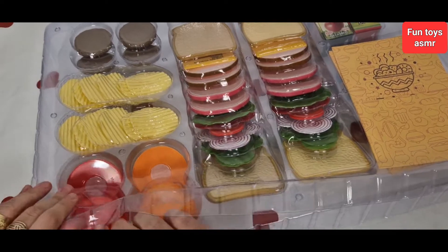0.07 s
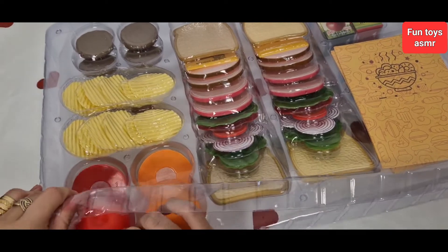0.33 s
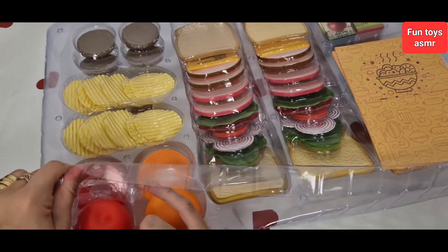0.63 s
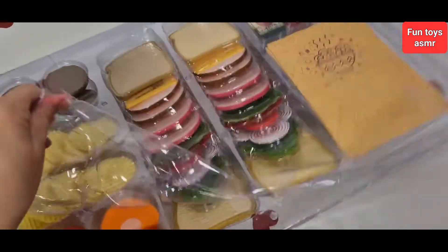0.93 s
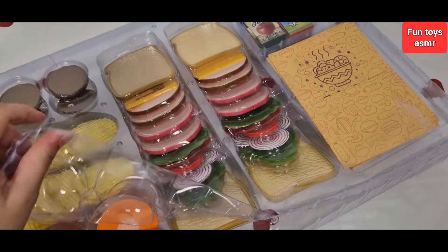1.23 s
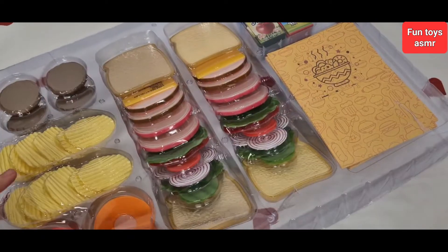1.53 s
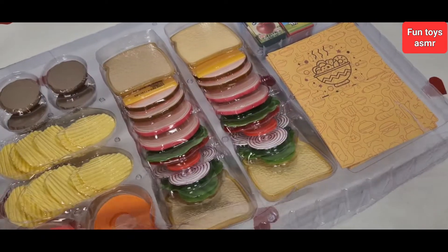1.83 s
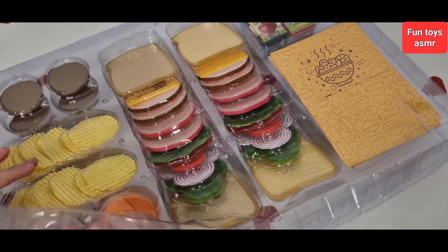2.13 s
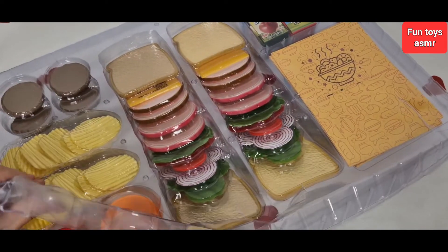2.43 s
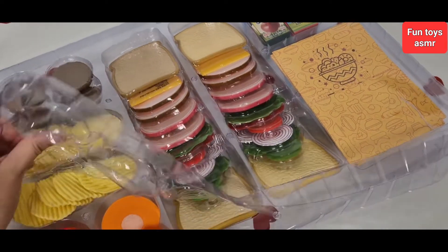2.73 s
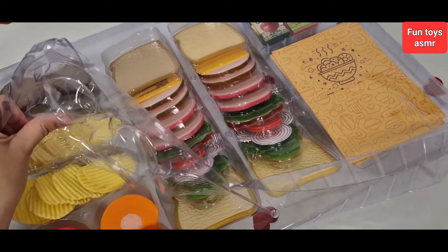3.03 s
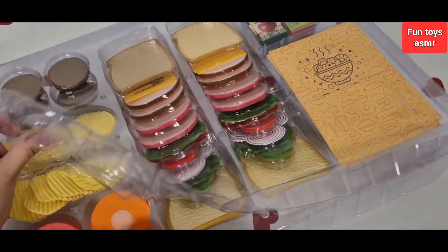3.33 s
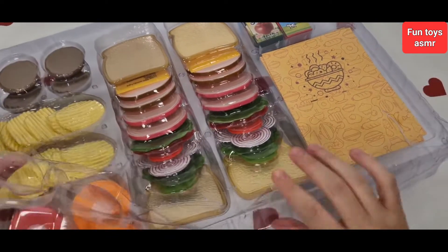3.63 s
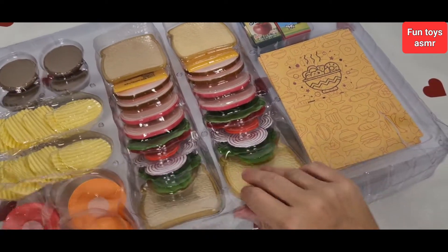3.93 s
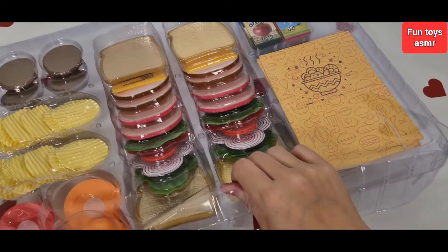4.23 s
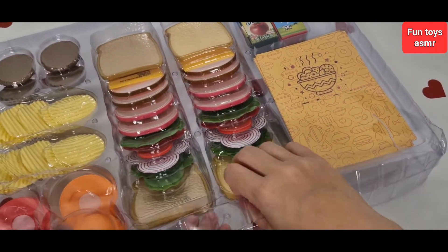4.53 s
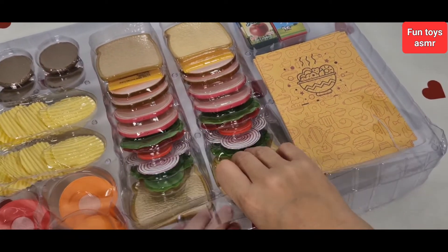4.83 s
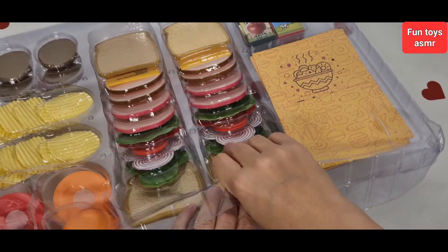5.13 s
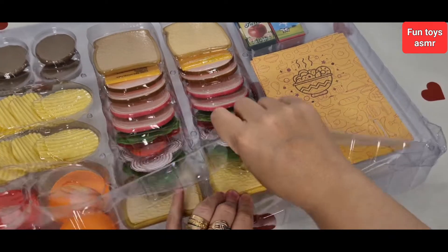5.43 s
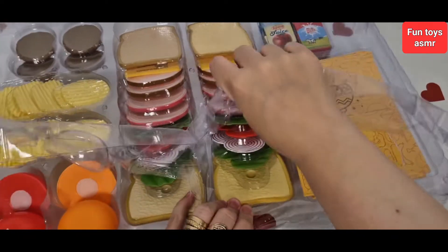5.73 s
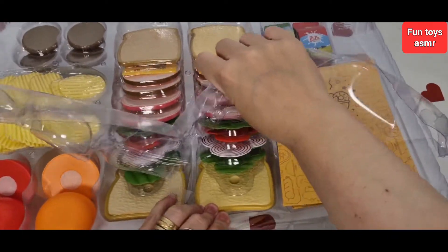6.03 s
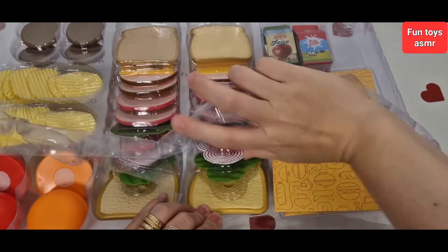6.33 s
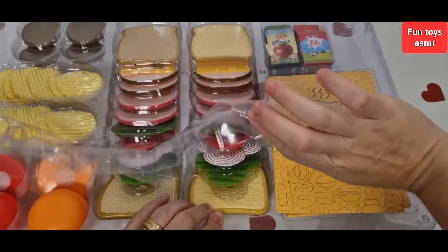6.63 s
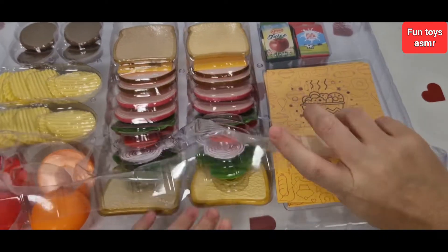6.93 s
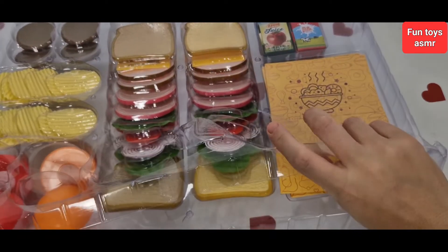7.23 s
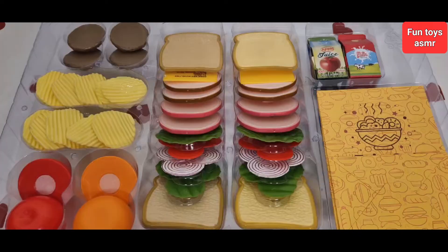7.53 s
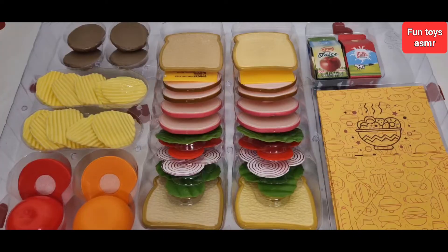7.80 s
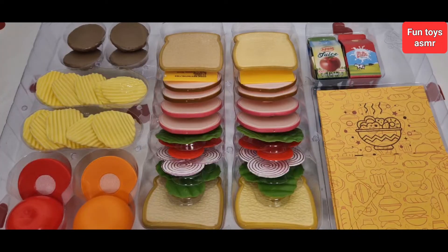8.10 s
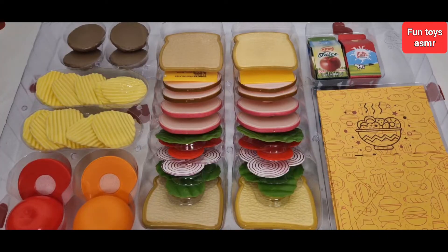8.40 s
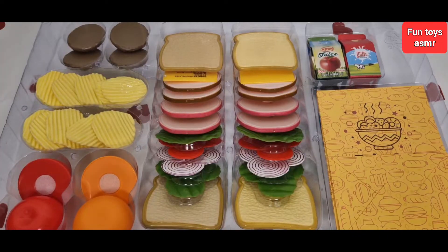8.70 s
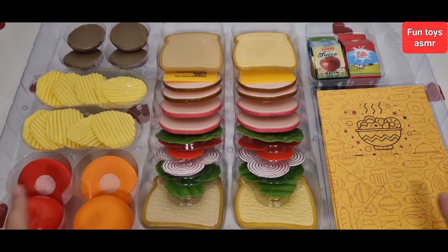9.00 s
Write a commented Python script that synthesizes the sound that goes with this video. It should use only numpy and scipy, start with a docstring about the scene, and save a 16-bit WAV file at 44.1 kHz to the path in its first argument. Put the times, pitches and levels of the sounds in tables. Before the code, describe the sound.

Hands prise a thin plastic lid off a tray of toy food, close by in a small room. Sharp snaps and dull knocks start at once, with faint crinkling and a low rumble from the flexing sheet. At about 0.9 seconds comes a fast cluster of snaps with a hollow boom and a fingertip squeak. Scattered snaps follow, then another dense run from 2.4 to 2.9 seconds. Separate snaps, knocks and small squeaks continue until the crackling builds from 5.2 seconds. At 5.7 seconds the lid springs free with the loudest snaps and a deep hollow boom. Lighter snaps and knocks go on until about 7 seconds, and the lid slides off in faint thin ticks by 7.5. After a near-quiet second, fingers softly brush and tap the packaging around 8.7 to 9 seconds.

```python
"""Runs of sharp plastic snaps, close by in a small room: hands prise the thin lid off a tray of toy food.
Each buckle of the sheet is a noise burst with its own short ring; faint crinkling fills the gaps.
Fingers and toy pieces knock dully, fingertips squeak, and the swaying sheet rumbles.
The hollow tray booms when jolted, loudest as the lid springs free. The lid slides off in thin ticks;
at the end the fingers only brush the packaging."""
import sys
import numpy as np
from scipy import signal
from scipy.fft import rfft, irfft, next_fast_len
from scipy.io import wavfile

SR = 44100
rng = np.random.default_rng(int(sys.argv[2]) if len(sys.argv) > 2 else 0)


def put_to_file(sound):
    """Save the sound as 16-bit audio at rate SR, in the file named by the first command-line argument."""
    columns = np.atleast_2d(sound).T  # one column per channel
    safe = np.clip(columns, -1, 1)
    whole_steps = np.round(safe * 32767)
    wavfile.write(sys.argv[1], SR, whole_steps.astype(np.int16))


N = 399546

# Lid buckles: start_s, clack_db, ring_hz, crack_re_clack_db, sizzle_re_clack_db
SNAPS = [(0.031, -27.5, 1780.0, 1.5, -10), (0.148, -34.5, 1170.0, -7, -21), (0.172, -34, 3190.0, 6, 0.5),
         (0.3, -37.5, 2660.0, 1, -8.5), (0.423, -23, 2190.0, 0, -8.5), (0.434, -29.5, 1460.0, -5.5, 4.5),
         (0.454, -20, 2140.0, -6.5, -12), (0.518, -18.5, 1460.0, -3.5, -9),
         (0.88, -15.5, 1270.0, -2.5, -13.5), (0.898, -23, 1400.0, 7, 6), (0.917, -24.0, 1320.0, -5.5, 0.5),
         (0.939, -19.5, 1610.0, -1, 3.5), (0.958, -22.5, 1440.0, -1.5, -2), (0.974, -21, 1510.0, 2.5, 3.5),
         (1.194, -35.5, 2260.0, -7, -7), (1.258, -34.5, 1360.0, 5, -4.5), (1.337, -28.5, 1160.0, -9, -14),
         (1.403, -45.5, 1390.0, 10, 13.5), (1.481, -28, 957.0, -2, -13), (1.506, -24, 2310.0, -5.5, -17),
         (1.532, -36, 2150.0, 2.5, -0.5), (1.78, -25.5, 592.0, -8, -23), (1.847, -28, 3430.0, 4, -1),
         (1.931, -30.5, 2040.0, -9, 3), (2.083, -50, 957.0, -3, -4), (2.216, -39, 682.0, -1.5, -8.5),
         (2.442, -24, 2390.0, 0.5, -22), (2.478, -24.5, 1650.0, -5.5, -10), (2.515, -27.5, 3190.0, 6, -7),
         (2.533, -24, 1600.0, 0.5, -9), (2.597, -17.5, 2070.0, 1.5, -7), (2.638, -19, 2050.0, -2.5, -20),
         (2.668, -15.5, 987.0, -3, -6.5), (2.8, -19, 850.0, -5.5, -5.5), (2.826, -17.5, 1170.0, -3.5, -2),
         (2.855, -22, 1120.0, -8, -6), (2.878, -27.0, 682.0, -3.5, -4), (3.142, -40.5, 5410.0, -1, 2.5),
         (3.361, -41.5, 1490.0, 3, 0), (3.383, -34.5, 3830.0, -2.5, -10), (3.532, -37.5, 1350.0, -5, -2),
         (3.568, -42.5, 1100.0, 7.5, 8.5), (3.656, -29, 1410.0, -2, -7), (3.707, -34, 4700.0, 0, 0),
         (3.777, -33.5, 1050.0, -3.5, -25), (4.005, -22, 2730.0, 3, -2.5), (4.032, -24.5, 2560.0, 4, -5.5),
         (4.109, -26.0, 1020.0, -3, -11.5), (4.21, -26.5, 3190.0, 0.5, -16),
         (4.242, -25.5, 3370.0, -1, -17), (4.426, -31.5, 698.0, -2.5, -5), (4.657, -16.5, 3190.0, -3, -15),
         (4.852, -32.5, 987.0, 0.5, -0.5), (4.861, -30.5, 1080.0, -9, -17), (5.06, -35.5, 5900.0, -1, 0.5),
         (5.181, -28.5, 1060.0, -2, -10), (5.203, -21.5, 4170.0, -2.5, -2.5), (5.303, -27, 640.0, 3, -34.5),
         (5.316, -19.5, 4070.0, -3.5, -4), (5.341, -23, 1150.0, -3, -11), (5.362, -24.5, 1210.0, 1, -12),
         (5.392, -22.5, 5670.0, 2.5, 2.5), (5.421, -24.0, 4620.0, 3, 0.5), (5.533, -21.5, 3370.0, 1, 2),
         (5.567, -18.0, 1090.0, -8, -10.5), (5.638, -29, 1780.0, 0.5, 8.5), (5.655, -15, 645.0, -4, -13),
         (5.67, -11.5, 1400.0, -3.5, -14.5), (5.686, -19, 905.0, -18, -13), (5.708, -13, 942.0, -6.5, -7),
         (5.92, -23, 4270.0, -1, 3.5), (5.938, -46.5, 5280.0, 21, 21.5), (6.059, -31, 773.0, -4, -13),
         (6.117, -29, 2020.0, 4.5, 7), (6.179, -30.5, 843.0, 2.5, -1), (6.247, -28.5, 5500.0, -1.5, -26),
         (6.463, -33.5, 1410.0, -6.5, -17), (6.7, -20.5, 3350.0, -6.5, -44),
         (6.918, -32, 1440.0, 2.5, -0.5), (6.971, -34.5, 2880.0, -2, -2.5), (6.987, -30, 987.0, -9, -8),
         (7.075, -33.5, 780.0, -5, -14), (7.308, -44.5, 905.0, -4, -6), (7.516, -51.5, 5040.0, 1.5, 3.5),
         (8.782, -43.5, 611.0, -5, -7.5), (8.903, -54.5, 1030.0, 10, 8.5)]


def snaps(buckles):
    """Contact rows for a buckling sheet: gentle buckles thud more, high rings follow the crack."""
    usual_clack_db = -28.5
    rows = []
    for start_s, clack_db, ring_hz, crack_db, sizzle_db in buckles:
        ring_db = clack_db - 3.5 + along([(2000, 0.0047), (3200, crack_db + 2.5)], ring_hz)
        body_db = clack_db - 10 - 0.23 * (clack_db - usual_clack_db)
        rows.append((start_s, ring_hz, ring_db, body_db, clack_db,
                     clack_db + crack_db, clack_db + sizzle_db))
    return rows


# Knocks on the tray: start_s, level_db, ring_hz
KNOCKS = [(0.278, -33.5, 360), (0.353, -32, 930), (0.673, -42, 640), (0.721, -37.5, 616),
          (1.311, -37.5, 920), (1.681, -40.5, 935), (2.259, -37.5, 920), (3.053, -24.5, 1044),
          (3.291, -32, 404), (4.388, -32.5, 505), (4.547, -33.5, 514), (6.097, -27.5, 600),
          (6.402, -37, 264), (6.511, -31, 295), (6.59, -22, 297), (6.743, -31.5, 467), (6.87, -36.0, 644),
          (7.788, -61.5, 380), (7.865, -51, 385.0)]
# Offsets from knock level: ring_db, body_db, clack_db, crack_db, sizzle_db
KNOCK_COLOUR_DB = [-0.5, -4, -3.5, -17.5, -40]


def knocks():
    """Contact rows for fingers and toy pieces striking the tray dully."""
    return [(start_s, hz, *(db + np.array(KNOCK_COLOUR_DB))) for start_s, db, hz in KNOCKS]


# Limits of the body, clack, crack and sizzle bands: edge_hz
EDGES_HZ = [250, 600, 2500, 7000, 16500]
BANDS = [signal.butter(3, edges, "bandpass", fs=SR, output="sos") for edges in zip(EDGES_HZ, EDGES_HZ[1:])]
STRAIN_BAND = signal.butter(2, [500, 7000], "bandpass", fs=SR, output="sos")
# Noise burst per band: rise_s, t60_s, lowpass_hz, trim_db, send_db, correlation
BURST_SHAPES = [(0.0014, 0.042, 2000, -2.5, -3, 1), (0.00071, 0.027, 1370, -2, -2.5, 0.89),
                (0.0028, 0.017, 2100, -1.5, -3, 0.14), (0.0008, .012, 14000, -1.5, -1.5, 0.089)]


def contacts():
    """Each knock, snap or crease rings and bursts in four bands; the sheet shivers on into the room."""
    linger, lead_in_s = 2.22, 0.0008
    out = np.zeros((2, N))
    echoes = [room(wall_db=-3, wall_s=0.0052) for _ in range(12)]  # the sheet keeps turning
    rows = knocks() + snaps(SNAPS) + snaps(creases())
    for k, (start_s, ring_hz, ring_db, *bands_db) in enumerate(rows):
        direct = amp(ring_db) * ring(ring_hz)
        send = amp(-5) * min(ring_hz / 600, 1, 1800 / ring_hz) * direct  # middle notes carry best
        for band, band_db, shape in zip(BANDS, bands_db, BURST_SHAPES):
            rise_s, t60_s, lowpass_hz, trim_db, send_db, correlation = shape
            gain = amp(band_db + trim_db)
            direct = direct + gain * burst(band, rise_s, t60_s, lowpass_hz, correlation)
            send = send + gain * amp(send_db) * burst(band, rise_s, t60_s * linger, lowpass_hz, 1.0)
        pan_db = rng.normal(2.5, 2.3)
        add(out, start_s - lead_in_s, direct * amp([[pan_db / 2], [-pan_db / 2]]))
        add(out, start_s - lead_in_s, signal.fftconvolve(send, echoes[k % len(echoes)], axes=1))
        clack_db = bands_db[1]
        strain = amp(clack_db - 18.5) * burst(STRAIN_BAND, 0.0044, 0.017, 900, 0.88)
        add(out, start_s - 0.006, strain)  # a faint swell leads into each snap
    return out


def ring(hz, cycles=11, sag=0.05, blur=0.42):
    """A facet flips over and rings briefly, its pitch sagging as it relaxes."""
    t = np.arange(SR // 25) / SR
    t60_s = 0.0058 + cycles / hz
    pitch_hz = hz * (1 + sag * (np.exp(-t / 0.0056) - 0.5))
    wander = blur * np.cumsum(rng.standard_normal(len(t))) * hz / np.sqrt(SR * 1000)
    phase = 2 * np.pi * (np.cumsum(pitch_hz) / SR + rng.random()) + wander
    stereo_skew = rng.normal(0, 0.5) * min(hz / 1500, 1) * np.array([[1], [-1]])
    attack = 1 - np.exp(-(t / (0.0017 + 0.5 / hz)) ** 2)
    return unit_onset(np.sin(phase + stereo_skew) * amp(-60 * t / t60_s) * attack)


def burst(band, rise_s, t60_s, lowpass_hz, correlation):
    """The spiky noise of a crease giving way, in one band."""
    t = np.arange(SR // 25) / SR
    spikes = amp(2.5 * np.repeat(rng.standard_normal(len(t)), 16)[:len(t)])
    envelope = amp(-60 * t / t60_s) * (1 - np.exp(-(t / rise_s) ** 2))
    noise = noise_pair(correlation, len(t)) * spikes * envelope
    dulled = signal.lfilter([1], [1, -np.exp(-2 * np.pi * lowpass_hz / SR)], noise)
    return unit_onset(signal.sosfilt(band, dulled))


# Jolts of tray and lid: start_s, boom_db, crinkle_db, sway_db
JOLTS = [(.28, -39, -57.5, -48.5), (0.891, -18.5, -31.5, -33), (0.941, -27.5, -28, -28),
         (1.12, -41, -59, -45), (1.488, -42, -60, -39), (1.85, -45, -54, -42), (2.667, -27, -25, -29.5),
         (2.826, -36.5, -36.5, -33.5), (4.039, -44, -36.5, -44.5), (4.488, -38.5, -45, -41.5),
         (5.31, -42, -36, -36), (5.719, -6, -27, -25), (6.347, -30.5, -50, -38), (6.93, -41, -35, -42),
         (8.78, -39.5, -55.5, -44.5)]
# Hollow tray modes: pitch_hz, level_db, t60_s
TRAY_MODES = [(83.1, -11.5, 0.16), (123, 1.5, .25), (272, -16, 0.18), (319, -25.5, 0.92), (424, -17, .25),
              (777, -27.5, 0.18), (880, -24, .3), (990, -15.5, 0.31), (1520, -23, 0.42)]


def tray():
    """A jolt sets the hollow tray booming."""
    out, t = np.zeros(N), np.arange(SR // 2) / SR
    attack = 1 - np.exp(-t / 0.0051)
    for start_s, boom_db, *_ in JOLTS:
        boom = sum(amp(db + rng.normal(0, 1) - 60 * t / t60_s) * np.sin(2 * np.pi * hz * t)
                   for hz, db, t60_s in TRAY_MODES)
        add(out, start_s, amp(boom_db) * boom * attack)
    return out


def shaking(starts_s, levels_db, fade_db_per_s):
    """Gain of the shaking that jolts leave in the sheet: quick swell, steady fade."""
    power, t = np.zeros(N), np.arange(SR) / SR
    for start_s, db in zip(starts_s, levels_db):
        add(power, start_s, amp(db - fade_db_per_s * t) ** 2 * (1 - np.exp(-t / 0.008)))
    return np.sqrt(power)


# Hands working the lid: time_s, effort_db
HANDLING = [(0.0, -49.5), (1.08, -38), (1.44, -48), (1.52, -49.5), (2.22, -52), (2.5, -53), (2.62, -29.5),
            (2.73, -31), (2.88, -43.5), (3.11, -62.5), (3.58, -30), (3.79, -61.5), (3.98, -40),
            (4.15, -49.5), (4.91, -54.5), (5.14, -42.5), (5.35, -28.5), (5.52, -29.5), (5.61, -29),
            (5.9, -38), (6.07, -36.5), (6.41, -43.5), (6.94, -44), (7.07, -57), (7.37, -51.5), (7.6, -79.5)]
# Fingers brushing the packaging: time_s, effort_db
BRUSHING = [(8.72, -85), (8.846, -73), (8.98, -62), (9.06, -81)]


def effort():
    """How hard the hands work the plastic, in dB per sample; silent between gestures."""
    t = np.arange(N) / SR
    gestures_db = [np.interp(t, *np.transpose(rows), left=-120, right=-120) for rows in (HANDLING, BRUSHING)]
    return np.max(gestures_db, axis=0)


def creases(rate_per_s=4):
    """Small creases give way at random, louder with the handling; rows as in SNAPS."""
    scatter = np.clip(rng.standard_normal((200, 3)), -2, 2)
    starts_s = np.cumsum(rng.exponential(size=200)) / rate_per_s
    rows = []
    for start_s, (force_db, detune, edge_db) in zip(starts_s, scatter):
        if start_s < HANDLING[-1][0]:
            clack_db = np.interp(start_s, *np.transpose(HANDLING)) - 3.5 + force_db
            rows.append((start_s, clack_db, 1050 * 2 ** (0.6 * detune), -7.5, -21 + edge_db))
    return rows


# Crinkle spectrum: frequency_hz, density_db
CRINKLE_SPECTRUM = [(130, -24.5), (220, -19), (330, 4.5), (520, -1.5), (1000, 0), (1700, -6.5),
                    (3200, -10.5), (5500, -14), (8000, -20), (13000, -20.5), (16000, -33.5)]


def crinkle(effort_db, shake_gain, rate_per_s=115, spread_db=5.5, rub_db=-1.5):
    """Tiny creases tick at random over the soft rub of skin on plastic."""
    t = np.arange(SR // 50) / SR
    ticks = (rng.random(N) < rate_per_s / SR) * amp(spread_db * np.minimum(rng.exponential(size=N), 3))
    envelope = signal.fftconvolve(ticks, amp(-60 * t / 0.023))[:N]
    grains = unit(envelope * noise_pair(0.39, N))
    left, right = grains + amp(rub_db) * noise_pair(0.16, N)
    mid = filtered(left + right, lambda hz: amp(along(CRINKLE_SPECTRUM, hz)))
    # Long waves are alike on both sides.
    side = filtered(left - right, lambda hz: amp(along(CRINKLE_SPECTRUM, hz)) * hz / np.hypot(hz, 500))
    return np.hypot(amp(effort_db - 0.5), shake_gain) * unit(np.array([mid + side, mid - side]))


# Fingertip squeaks: start_s, length_s, level_db, start_hz, end_hz, width_hz
RUBS = [(0.884, 0.13, -24.5, 898, 798, 1560), (3.233, 0.047, -41.5, 603, 498, 280),
        (3.916, 0.038, -46, 792, 890, 500), (4.418, 0.059, -36.5, 645, 777, 454),
        (6.466, 0.043, -33, 1183, 1493, 950), (8.663, 0.09, -59.5, 606, 515, 710),
        (8.729, 0.035, -45.5, 825, 730, 830), (8.701, 0.2, -55.5, 3005, 4180, 4000),
        (8.896, 0.0203, -53, 680, 1230, 123), (8.914, 0.019, -50, 1140, 1190, 151)]


def rubs():
    """Skin drags on the sheet and excites one gliding resonance."""
    out = np.zeros((2, N))
    for start_s, length_s, db, start_hz, end_hz, width_hz in RUBS:
        size = int(length_s * SR)
        lowpass = signal.butter(2, width_hz / 2, fs=SR, output="sos")
        grip = signal.sosfilt(lowpass, noise_pair(0.69, size) + 1j * noise_pair(0.68, size))
        phase = 2 * np.pi * np.cumsum(np.linspace(start_hz, end_hz, size)) / SR
        squeak = np.real(grip * np.exp(1j * phase))
        add(out, start_s, amp(db) * unit(squeak) * signal.windows.tukey(size, 0.5))
    return out


def creak(start_s=7.185, first_gap_s=0.014, slowing=1.1, level_db=-58.5, growth_db=0.9, count=9):
    """The loose lid slides off in thin ticks that slow down and grow."""
    out = np.zeros((2, N))
    gaps_s = first_gap_s * slowing ** np.arange(count)
    for k, tick_s in enumerate(start_s + np.cumsum(gaps_s) - first_gap_s):
        sizzle = burst(BANDS[3], 0.00026, 0.014, 8800, 0.35)
        crack = burst(BANDS[2], 0.00038, 0.0096, 6600, 0.28)
        add(out, tick_s, amp(level_db + growth_db * k) * (sizzle + crack))
    return out


# Swaying sheet spectrum: frequency_hz, density_db
SWAY_SPECTRUM = [(15, -31.5), (28, -15), (40, -3), (60, -15), (84, 5.5), (100, -6.5), (122, 4.5),
                 (165, -3.5), (230, -15), (500, -59), (1000, -100)]


def sway(effort_db, shake_gain):
    """The wide sheet rumbles as hands flex it and jolts shake it."""
    usual_effort_db = -44
    flex_db = -50 + 0.5 * (effort_db - usual_effort_db)
    return np.hypot(amp(flex_db), shake_gain) * shaped_noise(SWAY_SPECTRUM, correlation=0.96)


# Room decay: frequency_hz, t60_s
ROOM_DECAY = [(150, 0.44), (400, .32), (1000, 0.22), (2800, .3), (7000, 0.31), (15000, 0.21)]
# Left-right likeness of the echo: frequency_hz, correlation
ROOM_CORRELATION = [(150, 1), (300, 0.49), (600, 0.58), (1200, 0.37), (4000, 0.067)]


def room(wall_db, wall_s):
    """A stereo echo of energy 1: nearby table and walls first, then the diffuse tail."""
    hz, t, (a, b) = signal.stft(rng.standard_normal((2, SR // 4)), SR, nperseg=256)
    turn = np.arccos(np.clip(along(ROOM_CORRELATION, hz), -1, 1))[:, None] / 2
    spectra = np.cos(turn) * a + np.sin(turn) * np.array([b, -b])
    decay = amp(-60 * t / along(ROOM_DECAY, hz)[:, None])
    tail = signal.istft(spectra * decay, SR, nperseg=256)[1]
    t = np.arange(tail.shape[1]) / SR
    early_boost = 1 + amp(wall_db) * np.exp(-t / wall_s)
    attack = 1 - np.exp(-(t / 0.0024) ** 2)
    return unit(tail * early_boost * attack) / np.sqrt(len(t))


# Background spectrum: frequency_hz, density_db
RUMBLE_SPECTRUM = [(15, -16), (28, -5.5), (40, -4), (65, -6.5), (110, -11), (170, -23.5), (260, -33.5),
                   (1000, -44), (16000, -60)]


def background():
    """A faint steady rumble, the same on both sides."""
    return amp(-65.5) * shaped_noise(RUMBLE_SPECTRUM, correlation=1.0)


def shaped_noise(spectrum, correlation):
    """Stereo noise of rms 1 with the given spectrum."""
    return unit(filtered(noise_pair(correlation, N), lambda hz: amp(along(spectrum, hz))))


def noise_pair(correlation, size):
    """Two correlated white noises."""
    a, b = rng.standard_normal((2, size))
    turn = np.arccos(np.clip(correlation, -1, 1)) / 2
    return np.cos(turn) * a + np.sin(turn) * np.array([b, -b])


def amp(db):
    """Decibels to gain."""
    return 10 ** (np.asarray(db) / 20)


def unit(x):
    """Scale to rms 1."""
    return x / np.sqrt(np.mean(x ** 2) + 1e-20)


def unit_onset(x):
    """Scale to rms 1 over the first 8 ms."""
    return x / x[..., :SR // 125].std()


def along(points, hz):
    """Interpolate (frequency_hz, value) points on a log axis."""
    points_hz, values = np.transpose(points)
    return np.interp(np.log(hz + 1), np.log(points_hz + 1), values)


def filtered(x, response):
    """Apply a frequency response."""
    size = next_fast_len(N + SR // 2)
    return irfft(rfft(x, size) * response(np.fft.rfftfreq(size, 1 / SR)), size)[..., :N]


def add(track, start_s, sound):
    """Mix a sound into the track."""
    part = track[..., max(round(start_s * SR), 0):][..., :sound.shape[-1]]
    part += sound[..., :part.shape[-1]]


def scene():
    """The lid lies a little to the left, so that side hears it first; boom and rumble stay centred."""
    effort_db = effort()
    jolt_s, _, crinkle_db, sway_db = np.transpose(JOLTS)
    friction = rubs() + creak()
    friction += amp(-5.5) * signal.fftconvolve(friction, room(wall_db=0, wall_s=0.012), axes=1)[:, :N]
    low = tray() + sway(effort_db, shaking(jolt_s, sway_db, fade_db_per_s=67)) + background()
    lid = friction + crinkle(effort_db, shaking(jolt_s, crinkle_db, fade_db_per_s=81)) + contacts()
    left_lead_s = 0.00013
    return low + filtered(lid, lambda hz: np.exp(1j * np.pi * hz * left_lead_s * np.array([[1], [-1]])))


def record(dry):
    """Steep low-pass at 16 kHz."""
    return filtered(dry, lambda hz: 1 / (1 + (hz / 16000) ** 160))


dry = scene()
out = record(dry)
put_to_file(out)
```